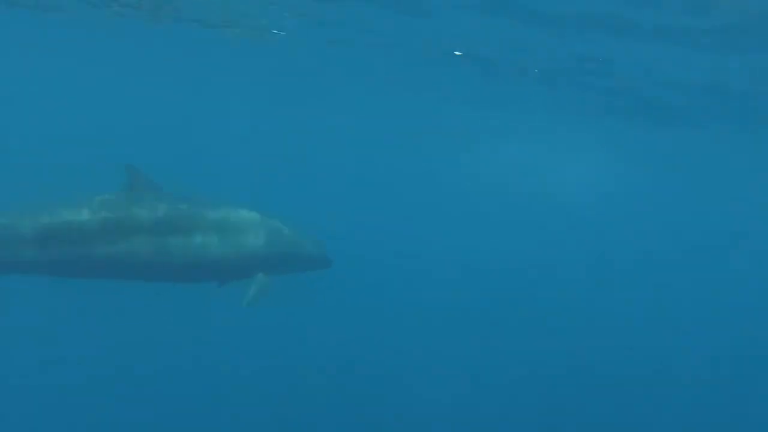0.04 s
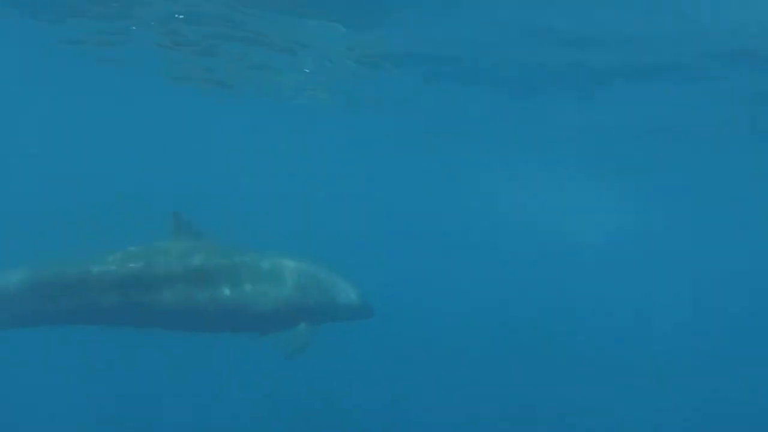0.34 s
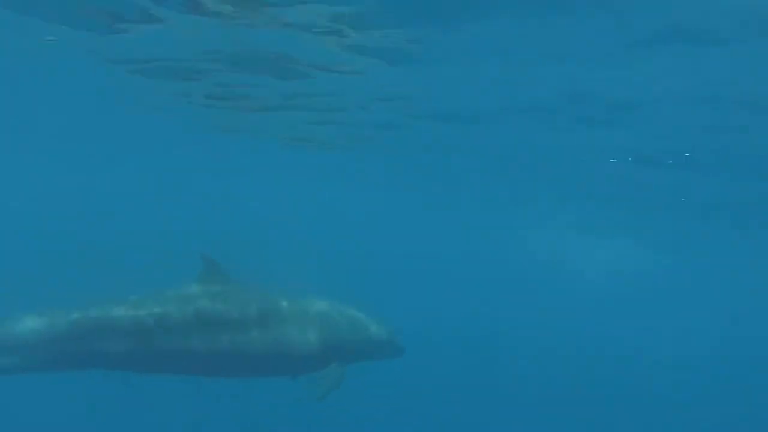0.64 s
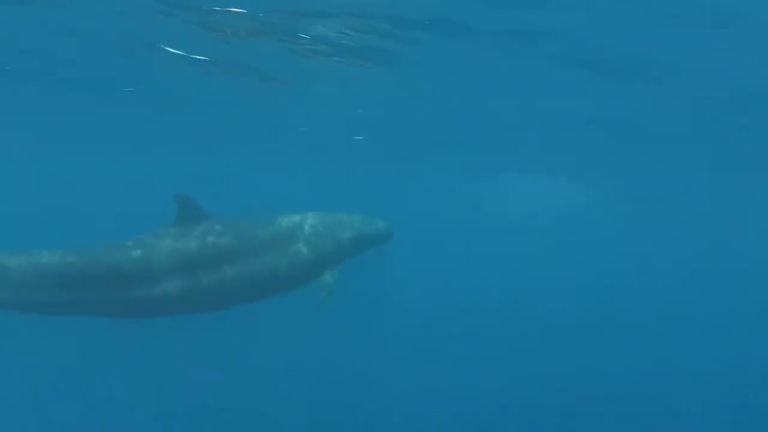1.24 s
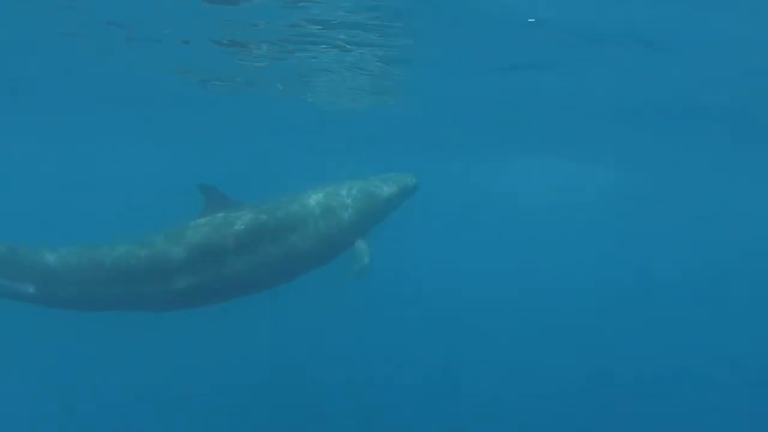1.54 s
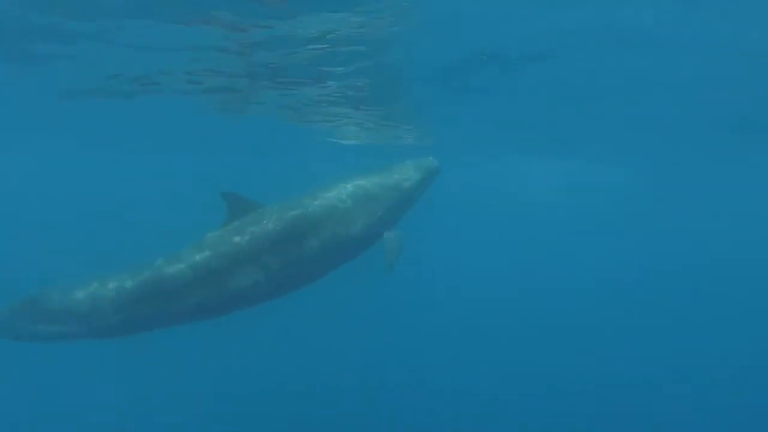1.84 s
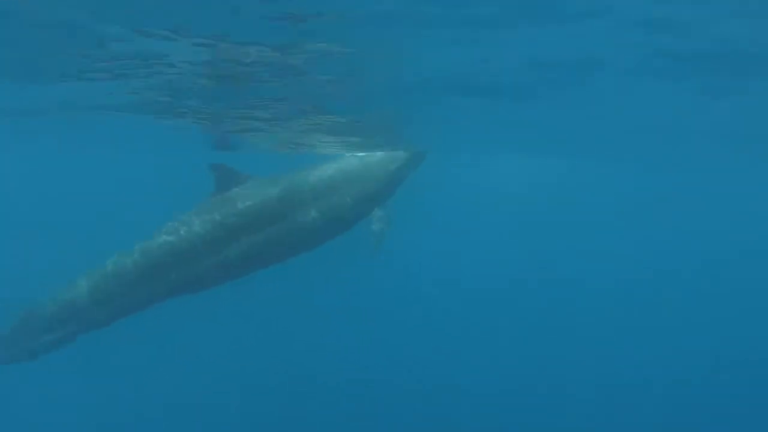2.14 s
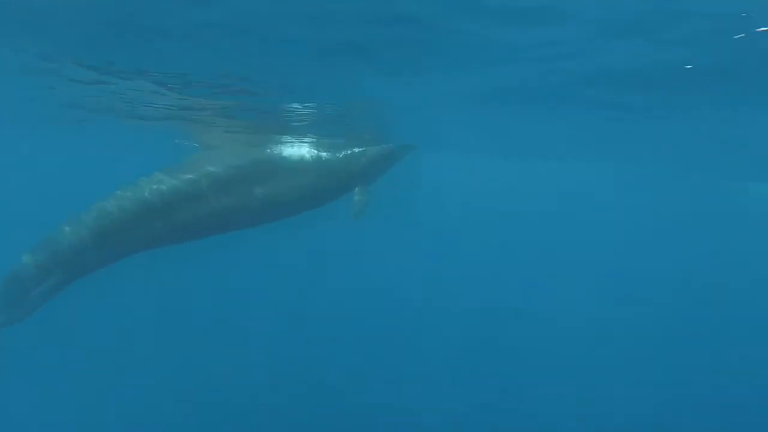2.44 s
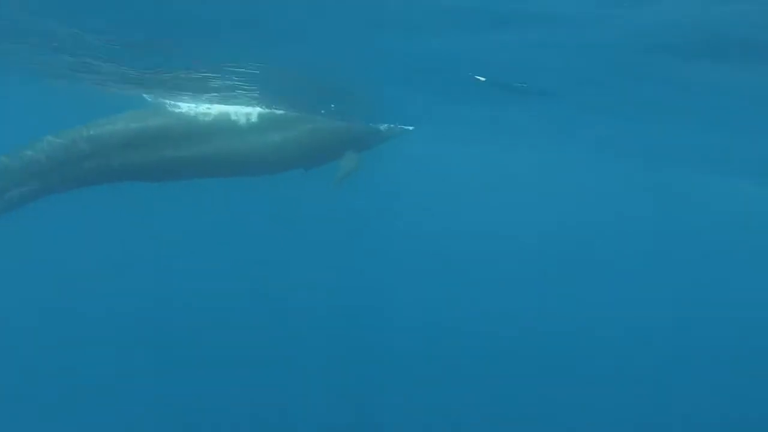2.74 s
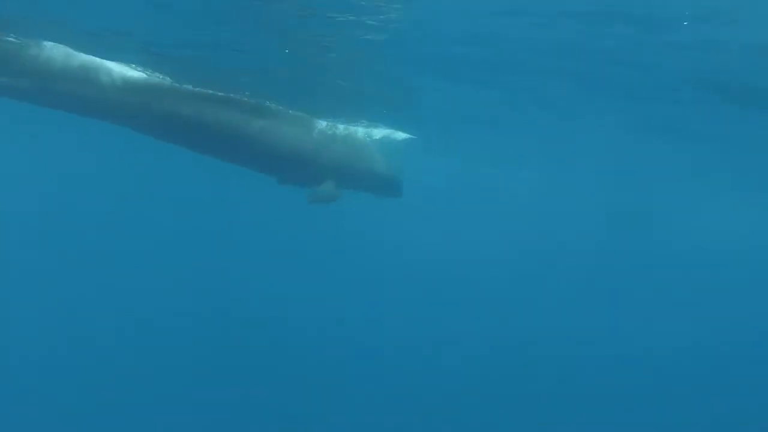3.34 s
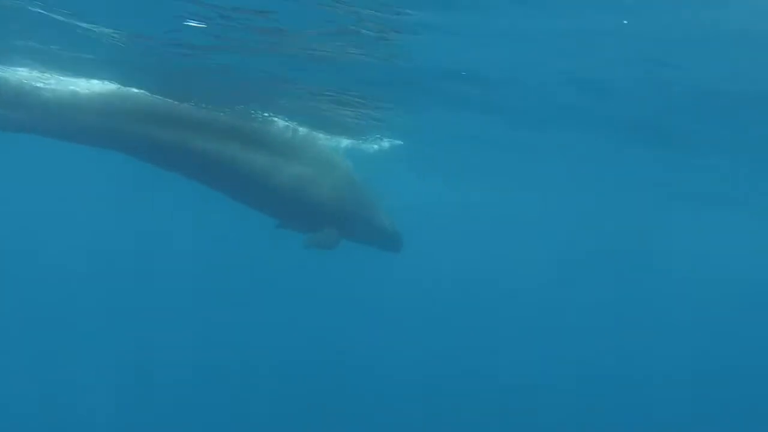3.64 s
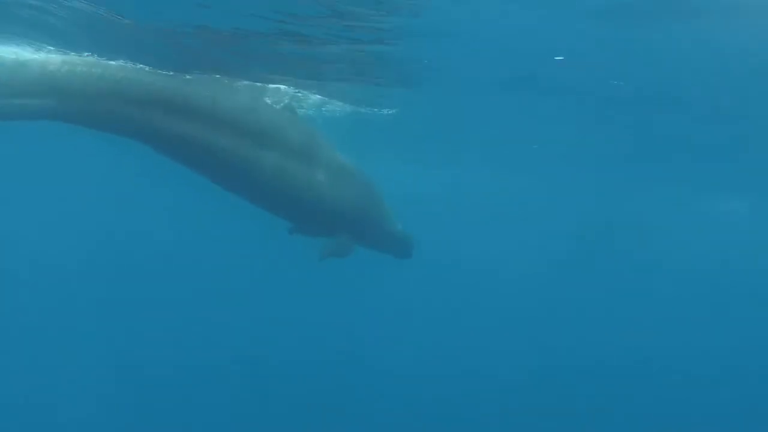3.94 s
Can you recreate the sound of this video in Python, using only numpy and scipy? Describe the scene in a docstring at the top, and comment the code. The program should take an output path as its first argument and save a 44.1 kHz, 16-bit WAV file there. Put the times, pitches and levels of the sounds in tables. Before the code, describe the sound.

Thin gliding dolphin whistles and clicks heard underwater amid close bubbles and a low rumble.

```python
"""Dolphins under choppy water

Dolphins whistle and buzz, heard through a camera housing just below the surface. Thin, gliding
whistles overlap; one animal clicks slowly, then so fast that the clicks blur into a buzz.
Close by, bubbles ring like tiny bells, wavelets slap and fizz, and water rumbles around the housing."""
import sys
import numpy as np
from scipy import signal
from scipy.fft import rfft, irfft, next_fast_len
from scipy.io import wavfile
from scipy.ndimage import uniform_filter1d

SR = 44100
rng = np.random.default_rng(int(sys.argv[2]) if len(sys.argv) > 2 else 0)


def inscribe(sig):
    """Save sig as 16-bit PCM at rate SR to the path in sys.argv[1].

    A 1-D sig is mono; a 2-D sig holds one channel per row.
    Samples are clipped to [-1, 1] before scaling.
    """
    pcm = np.round(np.clip(np.atleast_2d(sig).T, -1, 1) * 32767)
    wavfile.write(sys.argv[1], SR, pcm.astype(np.int16))


N = 176400   # 4 seconds

# How strongly each pitch of the water comes through the housing: (frequency [Hz], gain [dB])
HOUSING = [(150, 0.5), (330, -14.5), (500, -7.5), (680, 2.5), (900, -4.5), (1250, -2), (1620, -1),
           (1900, -10), (2200, -12), (2600, -9.5), (3000, -19.5), (3800, -17), (4600, -33.5), (5600, -30),
           (6800, -35.5), (8400, -33), (11000, -41.5), (15000, -44.5)]


def from_db(db):
    """Turn decibels into a factor to multiply a sound by."""
    return 10 ** (np.asarray(db) / 20)


def rms_one(x):
    """Scale a signal so that its average strength (RMS) is 1."""
    return x / np.sqrt(np.mean(x ** 2) + 1e-20)


def in_time(rows):
    """Join (time, value, ...) rows with straight lines: one curve for each value column."""
    times, *columns = np.transpose(rows)
    return [np.interp(np.arange(N) / SR, times, column) for column in columns]


def drift(rate_hz):
    """A smooth random wobble of typical size 1; a higher rate wobbles faster."""
    step, warm_up = 40, 2000   # samples
    pole = np.exp(-2 * np.pi * rate_hz * step / SR)
    noise = rng.standard_normal(N // step + warm_up + 2)
    slow = signal.lfilter([1], [1, -2 * pole, pole * pole], noise)[warm_up:]
    return np.interp(np.arange(N) / step, np.arange(len(slow)), rms_one(slow))


def colour(x, points):
    """Make some pitches louder and others softer, following (frequency [Hz], gain [dB]) points."""
    size = 2 * next_fast_len(len(x) // 2 + 4096)
    hz, db = np.transpose(points)
    grid_hz = np.arange(size // 2 + 1) * SR / size
    gain = from_db(np.interp(np.log(grid_hz + 1), np.log(hz), db))
    # Make the filter ring only after a sound, never before it (minimum phase).
    cepstrum = irfft(np.log(gain))
    cepstrum[1:size // 2] *= 2
    cepstrum[size // 2 + 1:] = 0
    return irfft(rfft(x, size) * np.exp(rfft(cepstrum)))[:len(x)]


def dying(t, t60):
    """A fade that drops by 60 dB in t60 seconds, the fade time."""
    return np.exp(-np.log(1000) * t / t60)


def ring(t, hz, t60):
    """A bubble rings as a dying tone whose pitch rises as it nears the surface."""
    rise = 0.079   # share of the pitch gained in one fade time
    return dying(t, t60) * np.sin(2 * np.pi * hz * t * (1 + rise * t / (2 * t60)))


def smear(pulses, t60):
    """Spread each pulse into a short, dying patter of the same energy."""
    t = np.arange(SR // 40) / SR
    tail = rng.standard_normal(len(t)) * dying(t, t60)
    return signal.fftconvolve(pulses, tail / np.linalg.norm(tail))[:N]


def burst(t60, points):
    """A splash: noise that swells fast and dies away, with the tone colour given by points."""
    t = np.arange(SR // 8) / SR
    fade = dying(t, t60)
    swell = 1 - np.exp(-t / (0.031 * t60))
    sound = colour(rng.standard_normal(len(t)) * swell * fade, points)
    return rms_one(sound) * np.sqrt(np.mean(fade ** 2))


def add(out, start_s, sound):
    """Mix a sound into out at the given time."""
    i = max(int(start_s * SR), 0)
    out[i:i + len(sound)] += sound[:max(N - i, 0)]


def flow():
    """Water pushes against the housing, making a deep rumble and a lumpy churn above it."""
    # How loud the rumble and the churn are: (time [s], relative level [dB])
    rumble_levels = [(0, -23), (.4, -22.5), (.75, -32), (1.15, -25.5), (1.5, -25.5), (2.1, -20.5),
                     (2.6, -21.5), (2.9, -25.5), (3.25, -22.5), (3.6, -29.5), (4, -27)]
    churn_levels = [(0, -32.5), (.42, -40), (.7, -41.5), (1.3, -38.5), (2.1, -32), (2.9, -36), (3.4, -32.5),
                    (4, -39.5)]
    # Their tone colours: (frequency [Hz], gain [dB])
    rumble_colour = [(10, -22), (20, 4.5), (27, 1.5), (36, -5), (55, -11.5), (76, -5.5), (98, -18.5),
                     (300, -73.5), (3000, -120)]
    churn_colour = [(60, -18), (110, 2.5), (220, -2), (330, -7), (480, -4), (650, -15.5), (1200, -46.5),
                    (8000, -100)]
    rumble_db, = in_time(rumble_levels)
    churn_db, = in_time(churn_levels)
    rumble = rms_one(colour(rng.standard_normal(N), rumble_colour))
    lumps = rng.standard_normal(N) * from_db(2.5 * drift(18))
    churn = rms_one(colour(lumps, churn_colour))
    return from_db(rumble_db + 1.5) * rumble + from_db(churn_db + 1.5) * churn


def crackle(pops_per_s=70, spread_db=5, kinds=6):
    """Tiny bubbles burst in scattered pops, louder as a dolphin breaks the surface."""
    # How loud the crackle is: (time [s], level [dB])
    levels = [(0, -60), (1.1, -72), (1.85, -81), (2.0, -62), (2.25, -70), (2.9, -72), (3.2, -80)]
    # Its bright tone colour: (frequency [Hz], gain [dB])
    pop_colour = [(3000, -15), (5000, -4), (7000, -5), (9000, -5), (13000, 0), (15000, -29)]
    db, = in_time(levels)
    strengths = from_db(spread_db * np.minimum(rng.exponential(1, N), 4))
    pops = strengths * (rng.random(N) < pops_per_s / SR)
    kind = rng.integers(0, kinds, N)   # each kind of pop gets its own patter
    patter = sum(smear(pops * (kind == k), t60=0.014) for k in range(kinds))
    return from_db(db) * rms_one(colour(patter, pop_colour))


def swarm(stir, low_hz, high_hz, per_s, cycles, spread_db, near_db, far_db):
    """Many bubbles of similar size ring in clumps, over the smooth wash of far ones."""
    stir_db, = in_time(stir)
    strengths = from_db(spread_db * np.minimum(rng.exponential(1, N), 4)) * rng.choice([-1, 1], N)
    chance = per_s * from_db(4 * drift(18)) / SR
    born = np.flatnonzero(rng.random(N) < chance)[:, None]
    hz = low_hz * (high_hz / low_hz) ** rng.random(N)[born]
    age = np.arange(int(SR * cycles / low_hz))   # samples
    rings = strengths[born] * ring(age / SR, hz, cycles / hz)
    near = np.bincount((born + age).ravel(), rings.ravel(), N)[:N]   # add each ring at its own time
    band = signal.butter(3, [low_hz * 0.77, min(high_hz * 0.98, .45 * SR)], "band", fs=SR, output="sos")
    near = rms_one(colour(signal.sosfilt(band, near), HOUSING))
    far = rms_one(colour(signal.sosfilt(band, rng.standard_normal(N)), HOUSING))
    return from_db(stir_db) * (from_db(near_db) * near + from_db(far_db) * far)


def surface():
    """The choppy surface stirs up four swarms of bubbles; the smaller they are, the higher they ring."""
    # How strongly each size is stirred: (time [s], relative level [dB])
    large = [(0, -33), (.75, -29), (1.2, -35.5), (1.5, -35.5), (2.15, -24), (2.6, -30), (2.9, -34.5),
             (3.35, -30), (4, -39)]
    medium = [(0, -32), (.7, -36.5), (1.35, -39), (1.6, -30), (2.17, -29.5), (2.58, -35), (2.82, -30.5),
              (3.22, -40), (3.5, -35), (3.8, -29), (4, -35)]
    small = [(0, -43), (.4, -41.5), (1.25, -45), (1.7, -36), (2.1, -39.5), (2.8, -39), (3.2, -45),
             (3.602, -40.5), (4, -44.5)]
    fizz = [(0, -51), (.9, -58.5), (1.3, -53.5), (2.1, -53.5), (2.5, -54.5), (3.3, -53.5), (4, -60.5)]
    # One swarm per size: (lowest pitch [Hz], highest pitch [Hz], typical rate [bubbles/s],
    # fade time [cycles], loudness spread [dB], near gain [dB], far gain [dB])
    swarms = [(520.7, 906, 130, 38, 1.5, -0.5, -8), (900, 1901, 470, 56, 4.5, 2, -6),
              (2144, 3523, 500, 59, 4, 3, -6), (4095, 15200, 600, 42, 2.5, -1.5, -0.5)]
    return sum(swarm(stir, *row) for stir, row in zip((large, medium, small, fizz), swarms))


def slaps():
    """Wavelets slap close by, each a short splash that is strongest over a broad range of pitches."""
    # The slaps: (time [s], centre frequency [Hz], relative level [dB], fade time [s])
    wavelets = [(.032, 1520, -26, 0.088), (.092, 1130, -23.5, 0.033), (.243, 900, -27.5, 0.04),
                (.280, 1100, -26.5, 0.019), (0.134, 1080, -18.5, 0.04), (.168, 900, -23, 0.043),
                (.310, 1160, -29, 0.1), (0.437, 1200, -25, 0.059), (0.4327, 3950, -21.5, .018),
                (.676, 1000, -24, .022), (0.849, 4300, -27, 0.027), (1.726, 3600, -35, 0.027),
                (2.062, 1660, -22, 0.028), (2.144, 1440, -22, 0.081), (2.289, 2490, -17.5, 0.023),
                (3.371, 2400, -31, 0.14), (3.433, 900, -28.5, 0.19), (3.465, 1610, -27, 0.097)]
    out = np.zeros(N)
    hz, housing_db = np.transpose(HOUSING)
    for start_s, centre_hz, db, t60 in wavelets:
        peak_db = -10 * np.log10(1 + (hz / centre_hz - centre_hz / hz) ** 2)
        treble_loss_db = 20 * np.log10(1 + (hz / (1.85 * centre_hz)) ** 2)
        slap_colour = np.transpose([hz, housing_db + peak_db - treble_loss_db])
        add(out, start_s, from_db(db + 9.5) * burst(t60, slap_colour))
    return out


def ticks(t60=0.0058):
    """Bubbles burst against the housing with a sharp tick."""
    # The bursts: (time [s], level [dB])
    hits = [(1.965, -31), (2.151, -38), (2.2895, -37), (2.296, -19), (2.3, -21), (3.83, -31.5)]
    # Their tone colour: (frequency [Hz], gain [dB])
    tick_colour = [(2000, 18), (4300, 12.5), (6700, 4), (8500, 12), (12000, -21), (15000, -27)]
    out = np.zeros(N)
    for start_s, db in hits:
        add(out, start_s, from_db(db) * burst(t60, tick_colour))
    return out


def bubbles(swell_s=0.0014):
    """Single bubbles break loose nearby; each tone swells quickly and rings out."""
    # The bubbles: (time [s], starting pitch [Hz], relative level [dB], fade time [s])
    near_bubbles = [ (.020, 507, -6, 0.04), (.095, 654, -23, 0.044), (.168, 483, -11, 0.081),
                    (.243, 770, -10, 0.043), (.313, 724, -5.5, 0.034), (.433, 2580, -13.5, 0.018),
                    (.543, 591, -15.5, 0.17), (.646, 628, -13.5, 0.1), (.683, 2130, -15.5, 0.025),
                    (1.152, 3600, -34, .05), (.436, 185, -12, 0.052), (.589, 1513, -14, 0.071),
                    (.600, 620, -18, 0.1), (.7035, 631, -5, 0.11), (.757, 687, -10.5, 0.041),
                    (0.757, 1260, -10.5, 0.026), (.853, 1090, -9.5, 0.047), (1.144, 1450, -13.5, 0.034),
                    (.807, 1296, -15.5, 0.039), (.808, 701, -10, 0.11), (.852, 654, -5, 0.069),
                    (.923, 730, -21, 0.028), (.951, 731, -14, 0.066), (1.000, 715, -13, 0.09),
                    (1.020, 1425, -17.5, 0.058), (1.002, 1184, -11.5, 0.036), (1.642, 1380, -11.5, 0.041),
                    (1.785, 1260, -12, .07), (1.817, 1180, -9.5, 0.034), (1.885, 1250, -0.5, 0.016),
                    (1.922, 1580, -2, 0.023), (2.064, 2220, 4.5, 0.0067), (2.129, 1460, -9.5, .035),
                    (2.143, 900, -6.5, 0.046), (2.291, 1490, -6.5, 0.021), (2.515, 634, -13.5, 0.11),
                    (2.696, 602, -8, 0.092), (2.711, 2550, -21.5, 0.1), (2.7265, 683, -8, 0.088),
                    (2.774, 754, -2.5, 0.017), (2.802, 1500, -21, 0.071), (3.342, 728, -11.5, 0.14),
                    (3.354, 1536, -6, 0.021), (3.373, 674, -2.5, 0.052), (3.435, 1140, 9, 0.0068),
                    (3.444, 3173, -1, 0.0062), (3.457, 1260, -8, 0.029), (3.774, 1200, -1, 0.018),
                    (3.848, 1245, 5, 0.0077), (3.900, 626, -5.5, 0.058)]
    out, t = np.zeros(N), np.arange(SR // 5) / SR
    swell = 1 - np.exp(-t / swell_s)
    for start_s, hz, db, t60 in near_bubbles:
        add(out, start_s, from_db(db) * swell * ring(t, hz, t60))
    return out


def sonar():
    """A dolphin's slow clicks run into an even buzz; each click trails a brief patter of echoes."""
    # Single clicks: (time [s], relative level [dB])
    clicks = [(.011, 2.5), (.274, 3.5), (.366, -1), (0.513, 3), (.6505, 4), (.793, 3.5), (0.949, 1.5),
              (1.267, -0.5), (1.277, 3)]
    # The buzz: (time [s], rate [clicks/s], relative level [dB])
    buzz = [(1.286, 118, -.5), (1.32, 137, 0), (1.356, 168, -.5), (1.41, 198, -1), (1.47, 204, .5),
            (1.6, 196, -.5), (1.69, 189, -4.5), (1.735, 190, -15)]
    # Tone colour of a click: (frequency [Hz], gain [dB])
    click_colour = [(2000, -36), (3300, -2), (3900, 4), (4700, -6.5), (5400, -2), (5950, 3), (6950, -12),
                    (8000, -3.5), (9300, -7), (12100, -14.5), (15000, -23)]
    t = np.arange(N) / SR
    rate, buzz_db = in_time(buzz)
    buzzing = (t >= buzz[0][0]) & (t <= buzz[-1][0])
    count = np.cumsum(rate * (1 + 0.002 * drift(23)) * buzzing) / SR
    # A pulse falls wherever the count passes a whole number, even between two samples.
    samples_off = (count - np.round(count)) * SR / rate
    pulses = np.sinc(samples_off) * np.exp(-(samples_off / 10) ** 2) * from_db(buzz_db) * buzzing
    for start_s, db in clicks:
        add(pulses, start_s, from_db([db]))
    echoes = from_db(-17) * smear(pulses, t60=0.009)
    return from_db(-14) * colour(pulses + echoes, click_colour)


def whistles(fade_s=0.002, waver_share=0.00098, faint_below_db=-56):
    """Each whistle is one gliding tone; the fainter it is, the more it flickers as it crosses the waves."""
    # One list of points per whistle: (time [s], pitch [Hz], relative level [dB])
    glides = [
        [(0, 3930, -32), (.12, 4003, -32.5), (.24, 4146, -30.5), (.35, 4450, -42), (.46, 4800, -41.5),
         (.58, 5065, -49.5), (.74, 5300, -41), (.896, 5540, -41.5), (.948, 5780, -36.5), (.99, 6600, -54)],
        [(0, 6240, -44.5), (.218, 6020, -44.5), (.446, 5970, -44), (.526, 5850, -50), (.58, 5580, -62)],
        [(0, 11300, -58), (.12, 11400, -58), (.28, 11340, -57), (.37, 11700, -61), (.43, 11800, -73)],
        [(.15, 8200, -54), (.26, 7850, -59), (.36, 7500, -56), (.6, 6400, -64), (.79, 5950, -70)],
        [(.37, 8500, -60), (.41, 8600, -60), (.52, 9300, -64), (.66, 10350, -70), (.71, 11000, -63),
         (.76, 11200, -69)],
        [(.82, 7227, -60), (.922, 7374, -69), (1.186, 7396, -44), (1.27, 7350, -49.5), (1.32, 6887, -55)],
        [(1.35, 3760, -46), (1.406, 3230, -42), (1.508, 2785, -31), (1.548, 2716, -33.5), (1.58, 2570, -46)],
        [(1.42, 8600, -56), (1.445, 9600, -48), (1.5, 8480, -45), (1.552, 7940, -45), (1.626, 7830, -46.5),
         (1.72, 7800, -50.5), (1.75, 8060, -73)],
        [(2.01, 9560, -68), (2.14, 9160, -67), (2.28, 8000, -76)],
        [(2.84, 6200, -68), (2.998, 5985, -51.5), (3.12, 5910, -48), (3.392, 5850, -49.5), (3.6, 5750, -50.5),
         (3.65, 5430, -70)],
        [(2.95, 7200, -57), (3, 8080, -62), (3.1, 8540, -55), (3.18, 9800, -70), (3.35, 10600, -55),
         (3.58, 11100, -70)],
        [(3.87, 5900, -65), (4, 6330, -74)],
        [(.31, 8700, -63), (.49, 9650, -72)],
        [(.96, 9540, -70), (1.01, 8700, -66), (1.11, 9600, -70)],
        [(2.96, 9750, -73), (3.42, 8350, -71)],
        [(3.35, 9640, -80), (3.82, 8980, -66), (4, 9000, -70)],
    ]
    out, t = np.zeros(N), np.arange(N) / SR
    for glide in glides:
        hz, db = in_time(glide)
        hz = uniform_filter1d(hz, size=800)   # round off the corners of the glide
        hz *= 1 + waver_share * drift(20.6)
        tone = np.sqrt(2) * np.sin(2 * np.pi * np.cumsum(hz) / SR)
        flicker_db = (0.9 + 0.29 * np.maximum(faint_below_db - db, 0)) * drift(9.5)
        fade = np.clip(np.minimum(t - glide[0][0], glide[-1][0] - t) / fade_s, 0, 1)
        out += fade * from_db(db - 1.2 + flicker_db) * tone
    return out


def scene():
    """The dolphins and the nearby water, mixed into one channel."""
    return (surface() + whistles() + sonar() + bubbles() + slaps() + ticks() + crackle() + flow())[None]


def record(dry, cutoff_hz=15300):
    """The highest treble is cut off steeply."""
    return signal.sosfilt(signal.ellip(10, .1, 80, cutoff_hz, fs=SR, output="sos"), dry)


dry = scene()
out = record(dry)
inscribe(out)
```